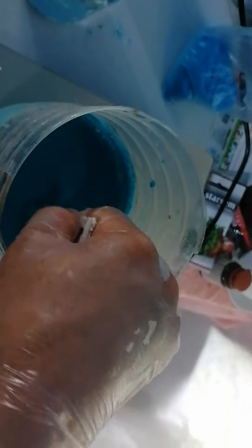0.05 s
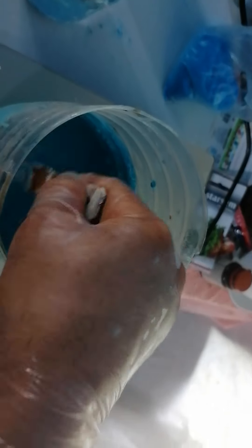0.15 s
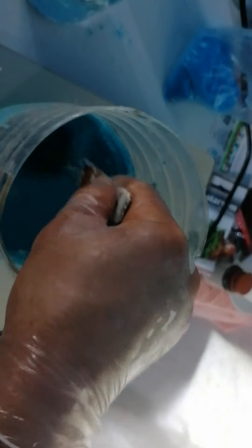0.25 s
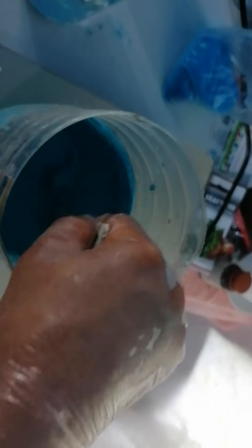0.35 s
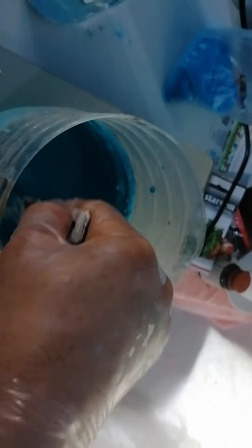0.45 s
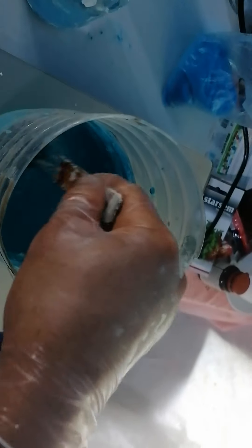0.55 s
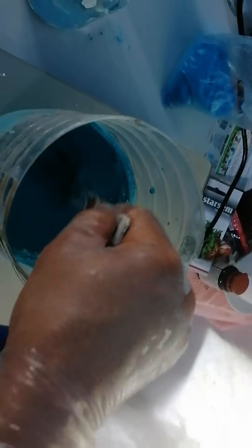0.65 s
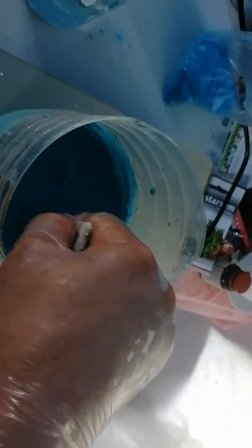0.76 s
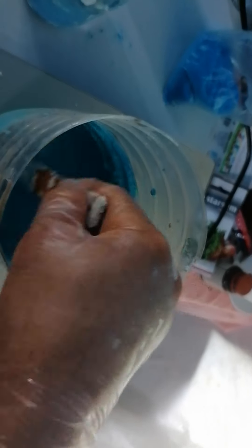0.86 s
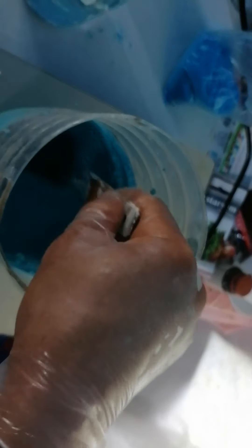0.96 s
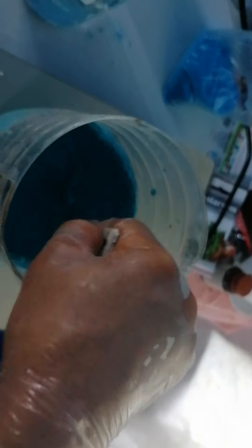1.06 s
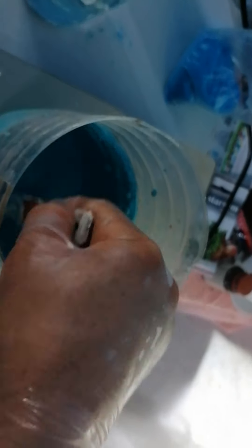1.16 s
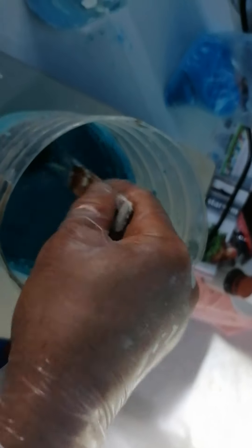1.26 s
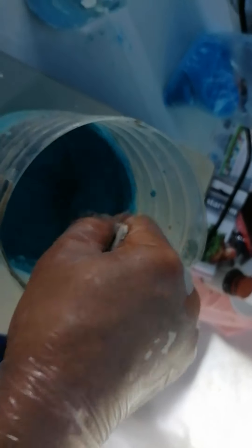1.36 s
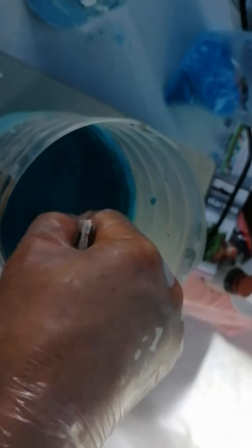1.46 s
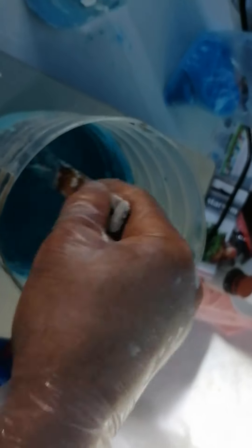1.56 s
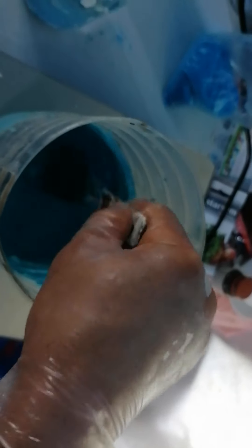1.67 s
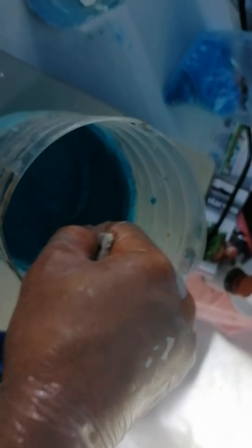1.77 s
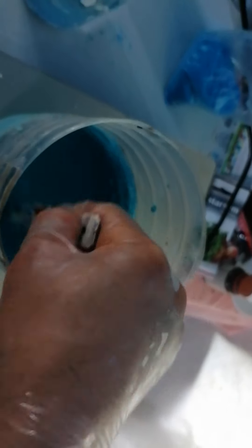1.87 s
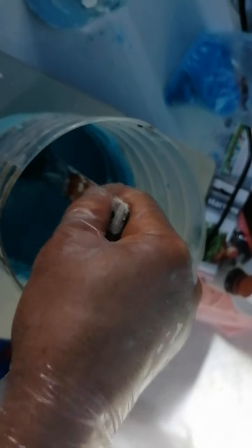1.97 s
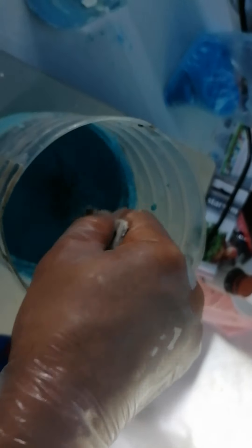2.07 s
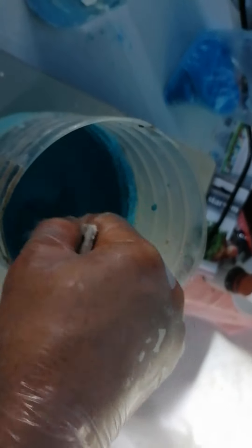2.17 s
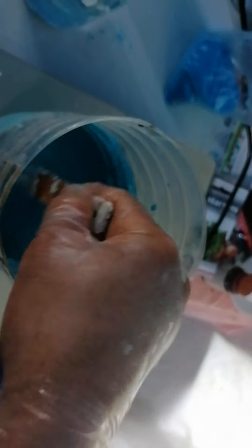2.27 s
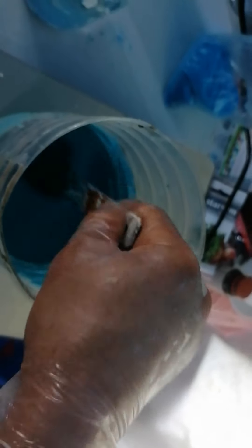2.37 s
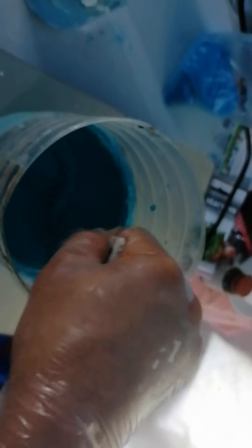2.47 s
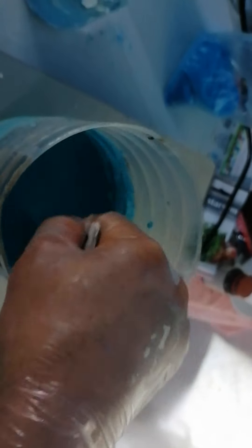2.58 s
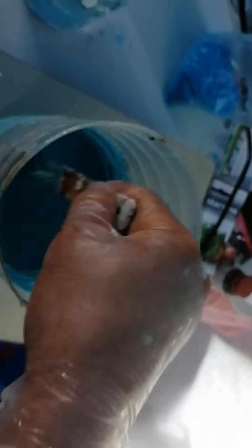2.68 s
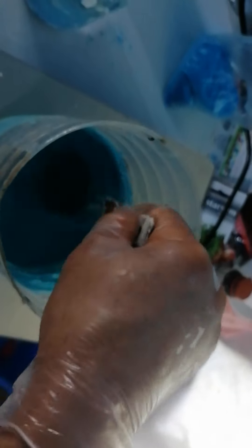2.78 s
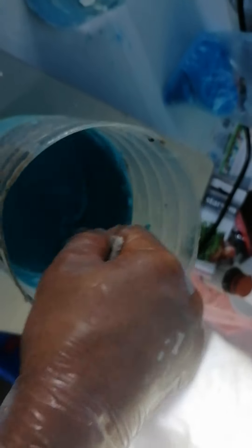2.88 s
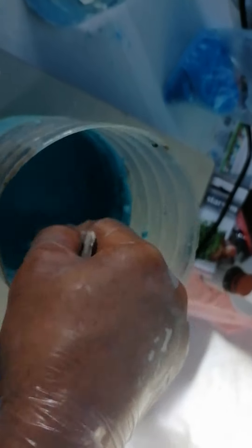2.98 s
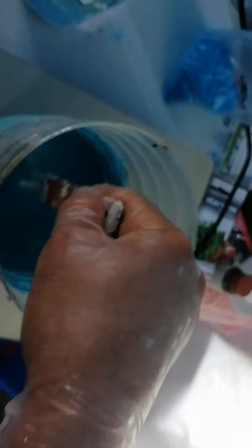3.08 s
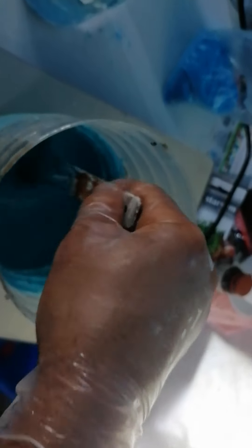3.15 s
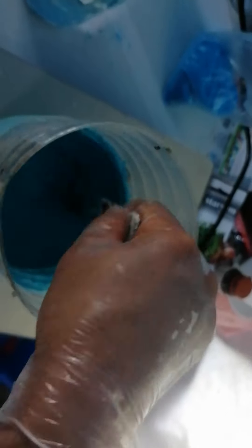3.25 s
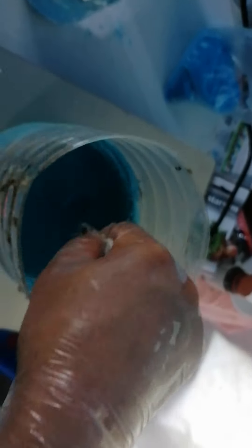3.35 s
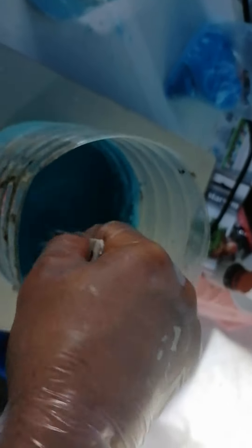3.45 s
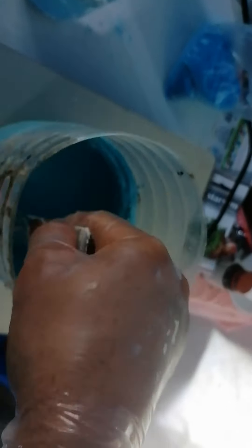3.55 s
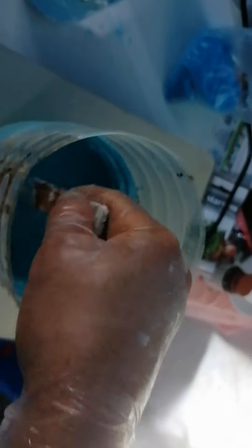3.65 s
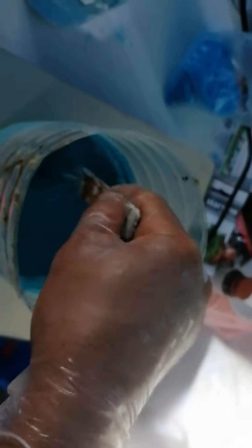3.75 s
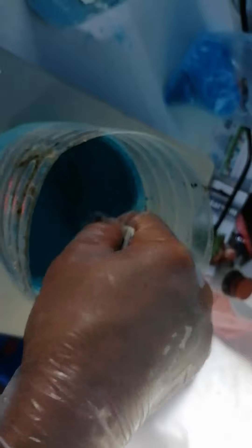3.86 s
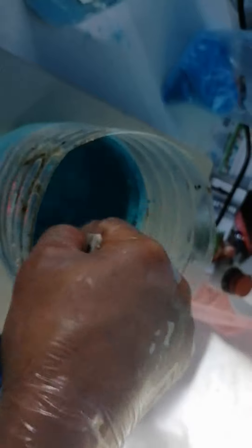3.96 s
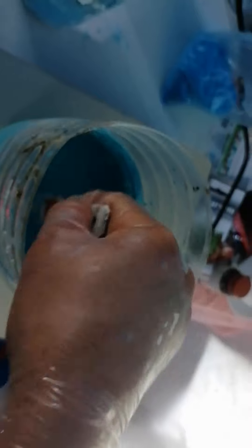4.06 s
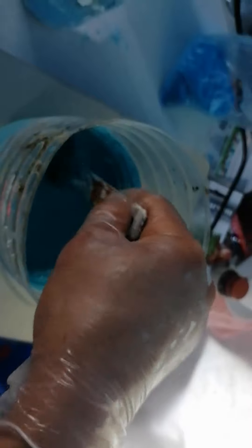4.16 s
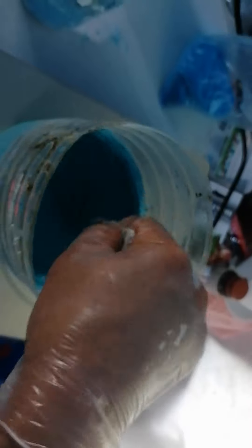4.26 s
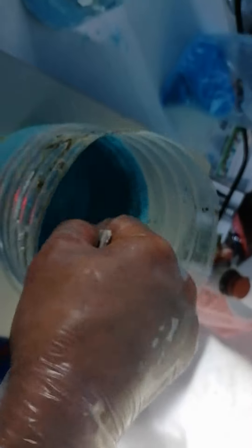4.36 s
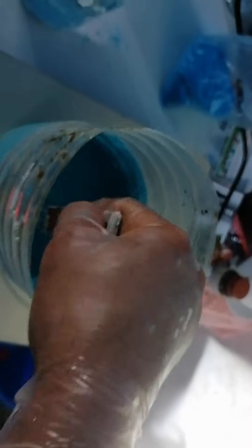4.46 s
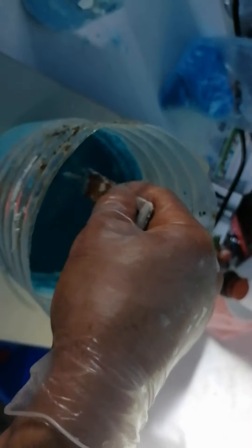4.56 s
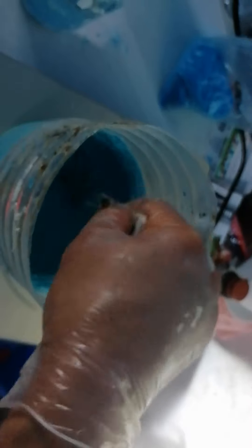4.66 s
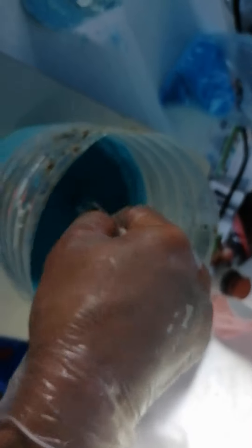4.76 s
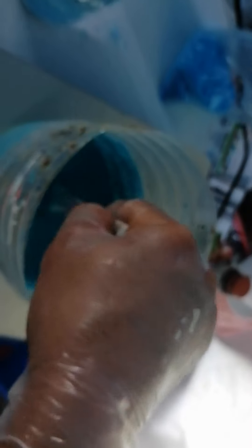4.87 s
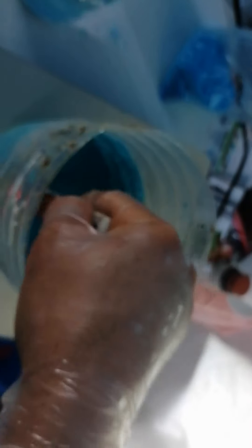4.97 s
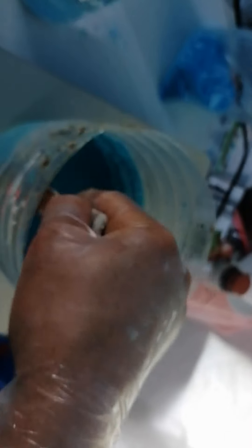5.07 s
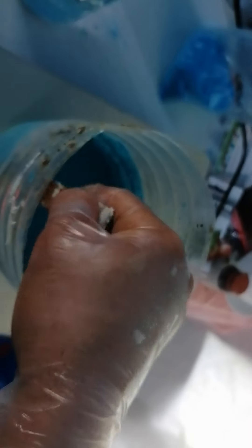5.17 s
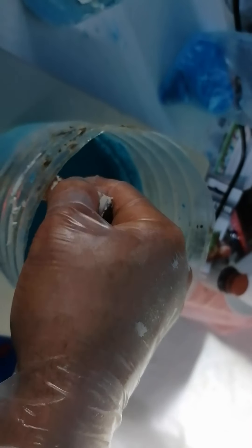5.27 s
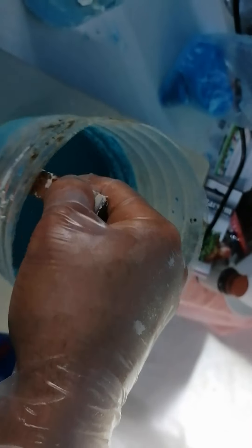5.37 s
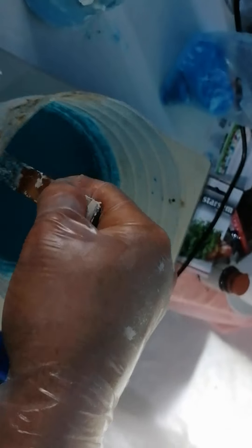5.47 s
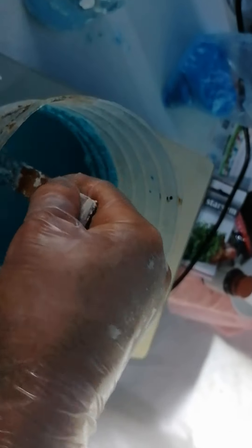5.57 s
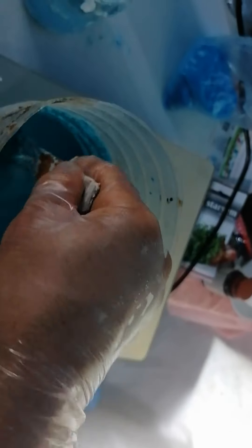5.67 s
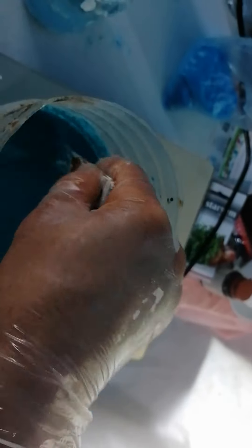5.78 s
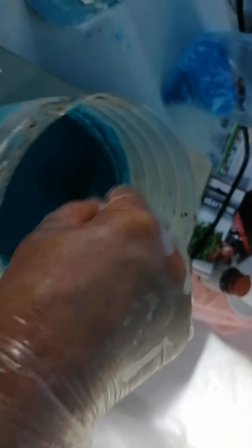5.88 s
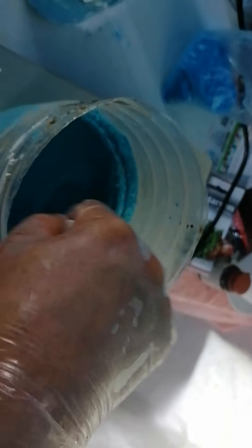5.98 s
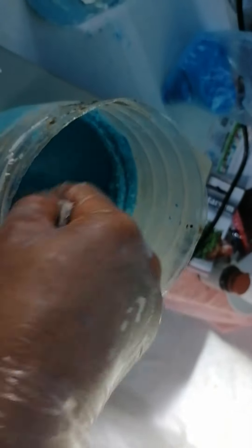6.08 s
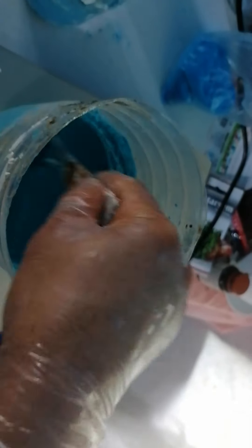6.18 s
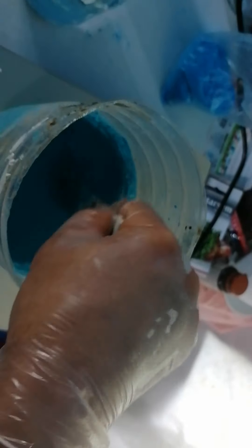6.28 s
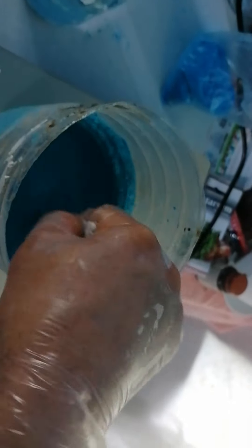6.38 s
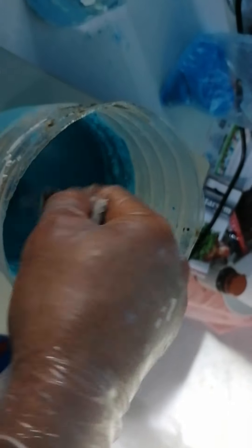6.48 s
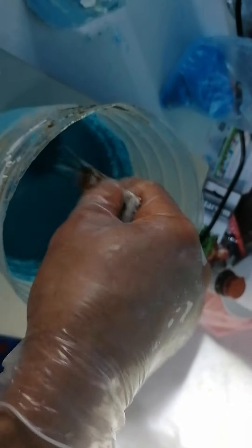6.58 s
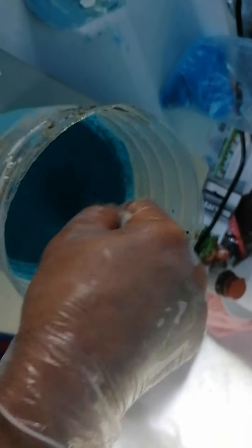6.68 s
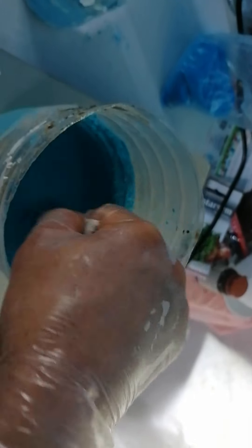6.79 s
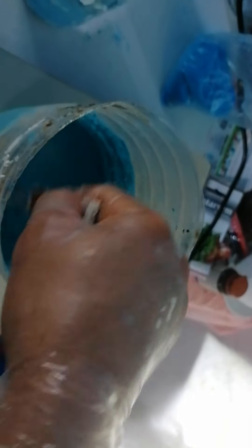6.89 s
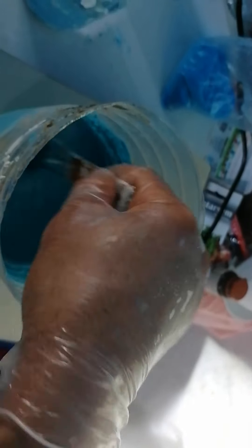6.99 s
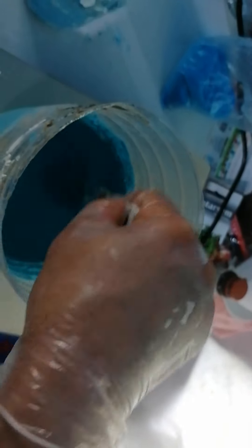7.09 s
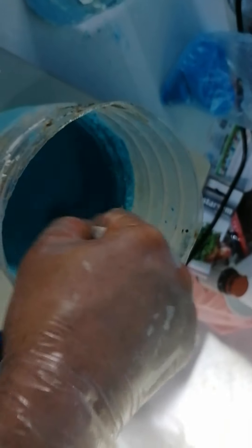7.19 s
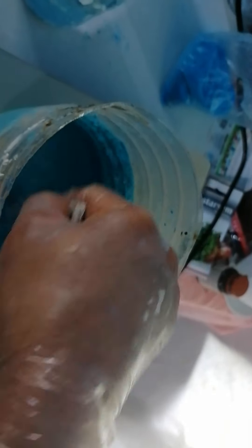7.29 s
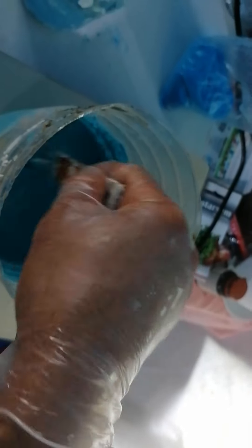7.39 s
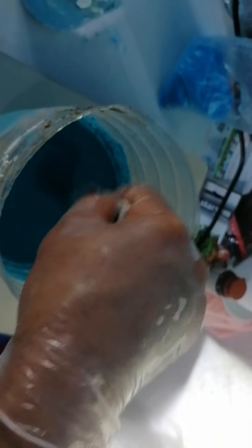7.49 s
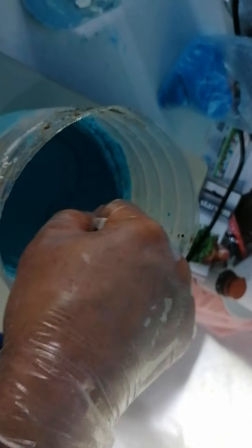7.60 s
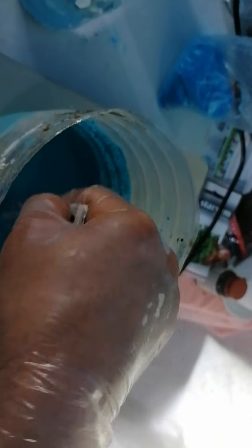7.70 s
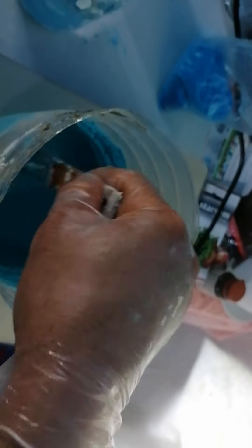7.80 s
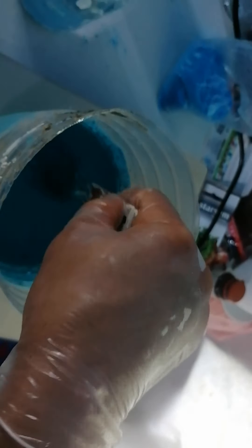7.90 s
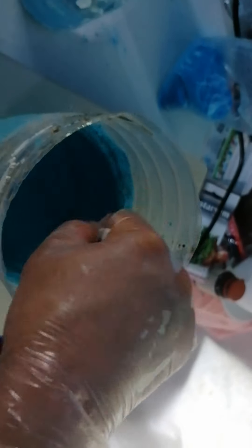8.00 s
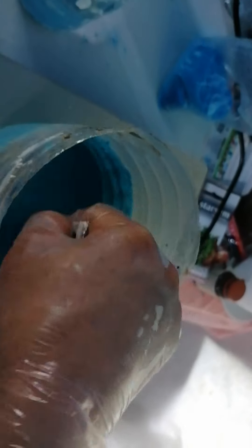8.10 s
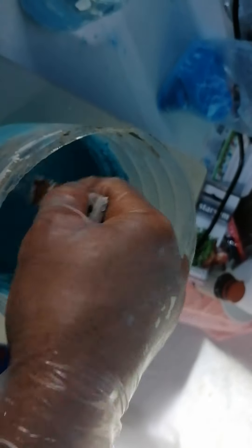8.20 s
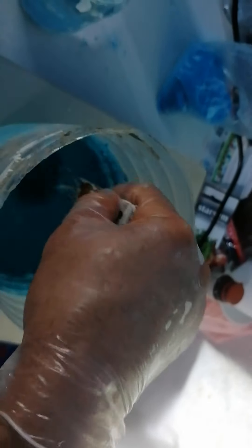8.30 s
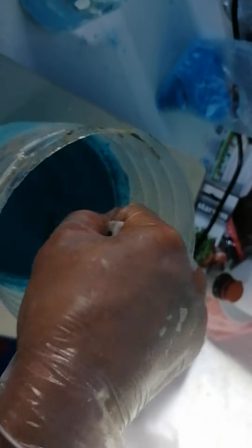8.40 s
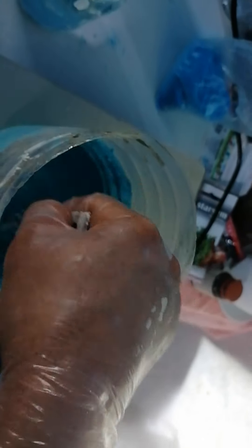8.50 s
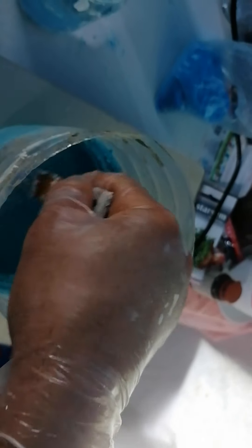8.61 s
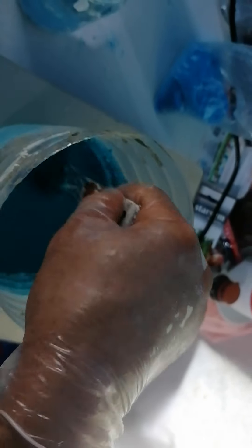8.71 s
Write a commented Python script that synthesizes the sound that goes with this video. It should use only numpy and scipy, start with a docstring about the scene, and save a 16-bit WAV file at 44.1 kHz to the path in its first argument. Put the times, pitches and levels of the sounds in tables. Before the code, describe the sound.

Close to the microphone in a small quiet room, a wooden spoon stirs thick paste in a thin plastic tub. Dry clacks with hollow, low booms come in uneven clusters, several per second. Between them are short gritty scrapes, sticky crackles, snapping air pockets and a few bubble pops. Knocking grows hardest midway, nearly stops briefly, then resumes.

```python
"""Quiet room noise, a short rasping scrape and a small wet click, then the first knock: a wooden spoon stirs
thick wet paste in a thin plastic tub, close to the microphone in a small room. Each knock is a dry clack of
damped wall resonances and noise, then a hollow boom that sags in pitch, a low base note and a thud. Between
knocks, random stick-slip grains rasp and fizz through sinking resonances, and filtered noise bursts click as
air pockets. A few bubbles pop, and once the tub booms softly, each with one short hollow note."""
import sys
import numpy as np
from scipy import signal
from scipy.fft import rfft, irfft, next_fast_len
from scipy.io import wavfile

SR = 44100
rng = np.random.default_rng(int(sys.argv[2]) if len(sys.argv) > 2 else 0)


def dump_mix(stems):
    """Bounce the given channels to the path in sys.argv[1] as a 16-bit WAV at rate SR."""
    frames = np.atleast_2d(stems).T  # one column per channel
    limited = np.clip(frames, -1, 1)  # hard clip at full scale
    pcm = np.round(limited * 32767).astype(np.int16)
    wavfile.write(sys.argv[1], SR, pcm)


N = 385434

# Event levels are source levels, ahead of the shared resonances and the balance in scene().
# Spoon sliding through the paste on the wall:
# start_s, length_s, rise_s, rasp_db, rasp_hz, fizz_db, fizz_hz (centres of the sinking resonances)
SCRAPE_STROKES = [(0.035, 0.046, 0.0098, -46, 1470, -61, 7300),
                  (0.586, 0.042, 0.008, -46.5, 1610, -62, 6860),
                  (0.812, 0.083, 0.0089, -45.5, 1660, -51.5, 7560),
                  (1.474, 0.19, 0.031, -69.5, 1600, -63.5, 7060),
                  (2.211, 0.11, 0.009, -47.5, 1520, -54.5, 6900),
                  (2.638, 0.072, 0.017, -51.5, 1430, -62, 6900),
                  (2.905, 0.024, 0.0075, -54, 2310, -47, 4700),
                  (2.924, 0.032, 0.0055, -59, 1980, -53.5, 7800),
                  (3.006, 0.028, 0.005, -46, 1800, -67, 6800),
                  (3.306, 0.084, 0.0049, -47.5, 2380, -50, 3930),
                  (3.417, 0.087, .035, -52, 1900, -58.5, 7200),
                  (3.706, 0.025, .004, -73, 1700, -65.5, 7000),
                  (3.78, 0.049, 0.047, -61, 1800, -55.5, 7200),
                  (3.861, 0.039, 0.0053, -46, 1550, -52.5, 6850),
                  (3.913, 0.035, 0.013, -42, 1540, -57.5, 3730),
                  (4.308, 0.038, .004, -51.5, 2260, -53, 7120), (4.338, 0.14, 0.023, -50, 1500, -58, 3970),
                  (4.692, 0.057, 0.0069, -45, 1930, -47, 3510), (5.806, 0.1, 0.013, -59, 1770, -60.5, 7440),
                  (6.163, 0.049, 0.029, -41, 1900, -44.5, 7000), (6.225, 0.026, .006, -48, 1150, -62, 6900),
                  (6.48, 0.072, .035, -44, 1700, -50.5, 3950), (6.715, 0.027, 0.0031, -48, 2000, -51, 7050),
                  (6.891, 0.1, .025, -57.5, 1610, -67.5, 7030)]
# Larger air pockets snapping in the paste: start_s, level_db, pocket_hz
POCKET_SNAPS = [(0.052, -50, 8700), (0.731, -49.5, 3430), (0.761, -61, 4000), (0.775, -51, 3330),
                (0.808, -53.5, 7200), (0.859, -39.5, 6300), (0.956, -53, 3720), (1.305, -58, 6930),
                (1.475, -49.5, 8640), (1.612, -56, 7500), (1.746, -46, 11660), (1.816, -37, 6960),
                (1.922, -56, 6100), (2.167, -50.5, 4600), (2.206, -59, 9210), (2.296, -52.5, 6900),
                (2.378, -49.5, 3250), (2.472, -49, 4300), (2.78, -44, 7200), (2.826, -43, 7600),
                (2.889, -52, 2970), (2.927, -46.5, 5100), (3.071, -41.5, 5660), (3.252, -73, 7000),
                (3.503, -54, 7440), (3.866, -48, 1580), (4.103, -59, 4000), (4.56, -52.5, 3000),
                (4.981, -43.5, 6250), (5.049, -38.5, 3820), (5.464, -50.5, 9800), (6.167, -47.5, 6950),
                (6.357, -57.5, 5100), (6.675, -77, 11500), (6.716, -50, 7060), (6.882, -64, 5960),
                (7.968, -44, 5100), (8.399, -49.5, 2030), (8.416, -48, 1930), (8.463, -46.5, 8500)]
# Spoon against the wall; the faint row at 2.027 s is no knock but a bubble bursting, played # through the same
# parts: start_s, panel_hz, base_db, wall_db, wall_hz, rim_db, rim_hz, panel_db, # snap_db (before SNAP_DB),
# boom_db, boom_hz, boom_swell_s, boom_fade_s (2 ms at least), thud_db
SPOON_KNOCKS = [(0.109,720,-43, -38.5, 1480, -51, 2520, -41, -61.0, -22.5, 423, 0.0065, 0.018, -42.5),
                (0.141,720,-44, -39, 1440, -43.5, 2460, -37, -55.5, -23, 384, 0.0046, 0.014, -44),
                (0.157,730,-51, -47.5, 1360, -67, 2750.0, -62, -62, -19, 419, 0.0069, 0.0082, -40.5),
                (0.295,790,-54, -41, 1905, -52, 2580, -45, -73, -28, 408, 0.012, 0.0028, -44.5),
                (0.467,820,-52, -35, 1514, -52, 2420, -38.5, -68.5, -17.5, 414, 0.0082, 0.011, -42),
                (0.506,695,-41.5, -35.5, 1390, -44, 2630, -37, -70, -37, 455, 0.0046, 0.0063, -43),
                (0.532,824,-54, -58, 1300.0, -64, 2740, -61, -75, -28.5, 419.5, 0.0082, 0.019, -45),
                (0.633,1080,-39, -38, 1790, -52, 2770, -47, -64, -27, 393, 0.024, 0.0057, -45),
                (0.729,1180,-38, -39.5, 1180.0, -55, 3400, -40, -81, -26, 422, 0.0083, 0.0018, -44.5),
                (0.756,604,-58, -54.5, 1420, -72, 2900.0, -42, -76, -28.5, 395, 0.0064, 0.02, -53.5),
                (0.859,600,-53.5, -48.5, 1900, -46, 2700, -39.5, -41, -30, 410.5, 0.021, 0.0066, -47),
                (0.91,600,-60, -43, 1380, -58, 2650, -54, -61, -23, 410, 0.011, 0.01, -45),
                (0.99,755,-43, -36.5, 1970, -58, 2680, -45.5, -69, -20.5, 393.4, 0.016, 0.015, -48),
                (1.023,590,-49.5, -50, 1770, -66, 2600, -54, -85, -31.5, 404, 0.0082, 0.0088, -56),
                (1.184,735,-44.5, -36, 1460, -56, 2940, -39, -61, -28, 425, 0.0069, 0.014, -42.5),
                (1.213,600,-43.5, -43.5, 1420, -74, 2640, -46, -73, -23.5, 415.5, 0.012, 0.021, -41.5),
                (1.233,600,-57, -47, 1540, -64, 2900, -55.5, -62.5, -42, 400, 0.0061, 0.006, -58),
                (1.252,830,-61, -53.5, 1450, -73, 2490.0, -48.5, -67, -24.5, 400, 0.012, 0.0088, -60),
                (1.329,730,-43, -36, 1470, -49, 2700, -44.5, -75, -25, 392, 0.016, 0.0079, -44),
                (1.373,600,-47.5, -34, 1910, -53, 2700, -35.5, -72, -28.5, 402, 0.015, 0.011, -48),
                (1.512,625,-50, -42, 1580, -53, 3430, -41, -72, -29, 391, 0.027, 0.0028, -44.5),
                (1.679,685,-45, -29, 1770, -44, 2650, -28.5, -47, -18, 379.7, 0.0096, 0.0097, -39.5),
                (1.718,587,-55, -54.5, 1560, -54, 2550.0, -43, -69.0, -32, 417, 0.0072, 0.011, -43),
                (1.816,800,-51, -29, 1540, -35, 2290, -43, -50, -31, 428, 0.006, 0.0057, -56),
                (1.879,670,-39, -37, 1450, -50, 2260, -42, -60, -19, 413, 0.013, 0.012, -42),
                (2.027,940,-68, -54, 1310, -55, 2860, -46, -51, -56, 410, 0.004, 0.0055, -64),
                (2.115,850,-45.5, -32.5, 1190, -36, 2420, -32, -48.5, -21.5, 422, 0.0031, 0.0076, -74),
                (2.139,614,-64, -51, 1170, -63, 2440, -43, -71, -27, 410, 0.0054, 0.011, -62),
                (2.251,690,-49, -42.5, 1550, -75, 2880.0, -39, -63, -22, 413, 0.021, 0.0079, -41.5),
                (2.4,696,-50.5, -48, 1700, -57, 2700, -46, -66, -27, 392, 0.0071, 0.016, -46),
                (2.483,827,-52, -47, 1180.0, -59, 2720, -42.5, -72, -29, 408, 0.0025, 0.0096, -52),
                (2.603,790,-44, -42.5, 1980, -79, 2490.0, -44.5, -68, -18.5, 398, 0.012, 0.012, -40.5),
                (2.678,740,-48, -53, 1410.0, -81, 3550.0, -52, -70, -40.5, 424, 0.03, 0.028, -49),
                (2.955,714,-41, -41.5, 1620, -46.5, 2400, -44, -74, -25.5, 406, 0.01, 0.041, -41.5),
                (3.026,733,-35, -34, 1430, -42, 2400, -38.5, -57, -21, 423, 0.0061, 0.0068, -33.5),
                (3.058,610,-41, -50, 1780, -67.5, 3550.0, -48, -59, -28, 412.5, 0.018, 0.0181, -43.5),
                (3.381,590,-41.5, -27, 1530, -38.5, 2450.0, -34, -57, -22, 397, 0.004, 0.013, -47),
                (3.404,583,-51, -48.5, 1510, -63.5, 2500.0, -36, -74, -22, 410, 0.0048, 0.0094, -46),
                (3.438,620,-57, -44, 1500.0, -49, 2430, -39, -61, -26.5, 376, 0.012, 0.0062, -45),
                (3.468,657,-49, -43.5, 1460, -55.5, 2510.0, -44, -62, -22, 404, 0.011, 0.0076, -37),
                (3.502,780,-36.5, -46.5, 1740, -61.0, 2930.0, -44, -64, -24.5, 413, 0.008, 0.0034, -43),
                (3.603,700,-39, -42.5, 1670, -61, 2640, -44, -66, -23, 387, 0.0044, 0.0089, -38),
                (3.632,640,-46, -50.5, 1470, -52, 2590, -48, -72.5, -34.5, 460, 0.0093, 0.0068, -43),
                (3.748,820,-38.5, -45.5, 1960, -71, 2940, -44.5, -67, -26, 319, 0.0064, 0.011, -49),
                (3.804,604,-58, -53, 1870, -66, 2780.0, -61, -68, -31.5, 400, 0.0098, 0.006, -49),
                (4.032,613,-52, -34.5, 1450, -40, 2720, -30.5, -55.5, -15.5, 411, 0.006, 0.014, -45),
                (4.056,610,-50, -36.5, 1890, -57, 2700, -42, -72.5, -36, 410, 0.0032, 0.0054, -55),
                (4.069,696,-47, -36, 1870, -59, 2740.0, -43, -71, -34, 407.0, 0.012, 0.0055, -42),
                (4.108,596,-35, -41, 1600, -53, 3120.0, -40.5, -55.5, -20, 405, 0.016, 0.0027, -41),
                (4.131,650,-50, -58, 1636, -67, 2850, -67, -78, -34, 460, 0.0068, 0.0089, -47),
                (4.232,800,-32.5, -29.5, 1690, -44, 2580, -35.5, -68, -15.5, 430, 0.0082, 0.0021, -40),
                (4.252,644,-52, -49, 1420, -67, 2420, -44, -52, -29.5, 378, 0.0057, 0.004, -56),
                (4.395,590,-35.5, -25.5, 1510, -35, 2370, -28, -49, -18.5, 403.5, 0.0051, 0.035, -36.5),
                (4.445,690,-36, -37, 1990.0, -56, 2620, -41, -54.5, -21.5, 424, 0.015, 0.013, -36),
                (4.511,610,-49, -36.5, 1890, -61, 2470, -48, -67, -34, 360, 0.0063, 0.0103, -49),
                (4.542,630,-34, -33.5, 1230, -40, 2420, -32, -57, -19.5, 389, 0.0033, 0.013, -39),
                (4.572,650,-42.5, -52.5, 1450, -61, 2900, -50, -68, -29.5, 411, 0.0058, 0.012, -47),
                (4.727,605,-37, -29.5, 1800, -59, 2710, -28.5, -60, -23.5, 420, 0.0029, 0.0036, -38),
                (4.759,820,-53, -47.5, 1390.0, -68, 2660, -49, -61, -25.5, 431, 0.011, 0.0086, -39),
                (4.783,654,-24.5, -27.5, 1460, -38, 2350, -27.5, -47.5, -21, 380, 0.008, 0.006, -38),
                (4.802,780,-38, -45, 1440, -61, 2500.0, -34, -74, -18, 410.5, 0.011, 0.016, -47),
                (4.838,780,-54, -61.5, 1340.0, -75, 2800.0, -43, -79, -29.5, 421.0, 0.015, 0.02, -61),
                (4.902,770,-52, -48.5, 1550.0, -69, 2670, -44, -66.5, -35.5, 424, 0.016, 0.026, -46),
                (4.96,724,-55, -50, 1340, -75, 2680, -39.5, -67, -31.5, 398.0, 0.0045, 0.0049, -51),
                (4.984,660,-67, -43.5, 1430, -50, 2700, -49, -64, -37.5, 435, 0.0088, 0.018, -55),
                (5.05,1200,-58, -46.5, 2170, -41, 2550, -55, -64, -37.5, 398, 0.003, 0.016, -46.5),
                (5.07,700,-45, -43.5, 1560, -54, 2500, -49.5, -65.5, -31.5, 419, 0.01, 0.009, -46),
                (5.847,746,-41.5, -46, 1700, -71, 2500, -52, -69, -31, 330, 0.0098, 0.0047, -45),
                (5.96,720,-58, -45.5, 1820, -59, 2640, -48, -73, -38, 383, 0.025, 0.0055, -55),
                (6.032,870,-38, -32, 1810, -48, 2520, -43, -59, -26, 437, 0.013, 0.0091, -48),
                (6.073,760,-33, -37, 1530, -65, 2750.0, -39.5, -72.0, -27, 398, 0.023, 0.0055, -42),
                (6.099,736,-44, -40.5, 1720, -68, 2610.0, -45, -71.0, -30, 372, 0.01, 0.0064, -45.5),
                (6.132,874,-43.5, -45.5, 1880, -58, 2580.0, -45, -60.5, -28, 386, 0.0068, 0.0098, -43),
                (6.203,1080,-56, -49, 1880, -50, 2620, -42, -52, -35, 413, 0.0083, 0.006, -62),
                (6.478,676,-42, -48, 1170, -58, 2640, -41.5, -71, -31, 400, 0.0076, 0.0046, -47.5),
                (6.514,600,-40.5, -46, 1560, -46, 2970, -46, -68, -24, 402, 0.0057, 0.013, -45.5),
                (6.535,1180,-47, -55.5, 1910, -46, 2970, -60, -59, -33, 370, 0.0073, 0.0068, -53),
                (6.608,810,-43.5, -36, 1720, -66, 2920, -27, -64, -15, 414, 0.013, 0.0074, -43),
                (6.907,786,-46, -45.5, 1560, -49.5, 2800, -45.5, -60, -34, 338, 0.017, 0.0049, -43.5),
                (6.925,604,-46, -45.5, 1490, -64, 3180.0, -52, -72, -29.5, 409, 0.0042, 0.0057, -40.5),
                (6.997,756,-36.5, -49.5, 1270, -65, 2630.0, -52, -73, -27, 386, 0.0064, 0.0079, -42.5),
                (7.093,598,-46.5, -35, 1370, -45.5, 2620, -42.5, -81.5, -19, 412.6, 0.0069, 0.023, -40.5),
                (7.293,610,-41.5, -32.5, 1510, -45, 2860, -36.5, -62, -13, 413, 0.012, 0.012, -39.5),
                (7.348,600,-49, -47, 1940, -50, 2650, -67, -59.5, -28, 374, 0.019, 0.0051, -43),
                (7.366,804,-36, -36.5, 1790, -50, 2670, -39, -57, -16.5, 411, 0.012, 0.0091, -42.5),
                (7.404,870,-51, -68, 1670, -75, 2850, -52, -70, -31, 391, 0.0097, 0.015, -45),
                (7.517,890,-46.5, -53.5, 1700, -59, 2710, -51, -78.5, -25.5, 375, 0.0084, 0.011, -44.5),
                (7.738,820,-35, -32, 1580, -49, 3260, -38.5, -62.5, -18.5, 397, 0.02, 0.0026, -37.5),
                (7.806,750,-32.5, -45, 1580, -63, 2510, -51, -67, -23.5, 384, 0.007, 0.0066, -37),
                (7.831,800,-43, -65, 1500, -70, 2860.0, -62, -67, -37, 427, 0.016, 0.0063, -40.5),
                (7.902,585,-58, -61.5, 1900, -67, 2760, -58, -62.5, -32, 383, 0.01, 0.0055, -40.5),
                (8.119,665,-42.5, -41.5, 1640, -53, 2750, -48.5, -62.5, -22.5, 403, 0.0049, 0.0069, -47),
                (8.155,660,-35.5, -47, 1580, -57, 2530, -65, -65, -29, 425, 0.0063, 0.012, -43),
                (8.178,716,-33.5, -34.5, 1850, -46, 2670, -37, -51, -15, 401.3, 0.008, 0.0077, -43),
                (8.343,680,-50, -49.5, 1400, -56, 2540, -47, -73, -34, 413.0, 0.021, 0.0068, -42.5),
                (8.406,682,-47.5, -39.5, 1870, -69, 2720, -31, -51, -18.5, 416, 0.012, 0.0092, -49),
                (8.593,690,-51.5, -42.5, 1550, -61, 2780.0, -44, -80, -37, 440, 0.0045, 0.0095, -55.5),
                (8.633,720,-49, -51, 1540, -70, 2900, -47, -77.0, -34.5, 385, 0.012, 0.013, -51),
                (8.673,820,-48, -45, 1486, -57, 2430, -41, -76, -21, 388, 0.0062, 0.01, -41.5)]
# Short hollow notes: big bubbles bursting, and at 2.825 s a brief boom of the tub at its air note: start_s,
# level_db, pitch_hz
HOLLOW_NOTES = [(0.84, -46, 1530), (2.025, -42.5, 960), (2.781, -45, 2080), (2.825, -45, 410),
                (3.5, -53, 2000), (3.6, -45, 476)]
# Ringing modes of the tub, scattered a little at each knock: mode_hz, relative_level_db, t60_s
TUB_MODES = [(207.7, -23, 0.22), (302.8, -18.5, 0.19), (361.6, -5.5, 0.13), (401.7, -6, 0.19),
             (424.34, -3, 0.18), (475.7, -9.5, 0.14), (536, -10, 0.12), (573, -19, 0.14), (652, -27, 0.14),
             (780, -23, 0.13), (953, -22, 0.1), (1134.5, -19.5, 0.083), (1487, -24.5, 0.1),
             (1940, -19, 0.094)]
# Bending modes of the thin wall: mode_hz, width_hz, peak_db
WALL_MODES = [(1130, 61, 3), (1365, 90, 1.5), (1480, 70, 1), (2079, 140, 2.5)]
# Treble resonances of the microphone ports: peak_hz, width_hz, peak_db
PORT_PEAKS = [(6850, 150, -1), (7700, 190, 2), (10150, 260, 4), (13350, 400, 2)]
# Tone curves, each: freq_hz, relative_gain_db
AIR_TONE = [(20, -31.5), (70, -21.5), (150, -19), (280, -20.5), (410, -16.5), (600, -16), (1100, -19.5),
            (1900, -15.5), (4500, -28), (7000, -26), (9000, -32.5), (15000, -53)]  # room hiss
RUMBLE_TONE = [(25, -11), (36, -6), (43, 0), (53, -6), (80, -6), (130, -13), (440, -50)]  # table under the tub
RASP_TONE = [(100, -18), (280, -3), (410, 5), (600, -3), (1000, -7), (1500, 0), (2100, -1), (2600, -7),
             (3200, -8), (4000, -13), (5500, -21), (10000, -42)]  # spoon rubbing the wall
FIZZ_TONE = [(1000, -20), (3000, 0), (4800, -3), (5800, -2), (7000, 4), (8400, -4), (10000, -3),
             (12000, -11), (14000, -12), (15500, -19)]  # wet film under a scrape
TICK_TONE = [(300, -20), (1000, -6), (2000, 2), (3200, -2), (4800, -4), (7000, 3), (8400, -2), (10000, -3),
             (13000, -8), (15500, -14)]  # snapping air pocket
SNAP_TONE = [(1500, -27.5), (3500, -5), (4800, -4), (7000, 5), (8400, -11), (11000, -9), (15000, -31.5)]  # wet film snapping at a knock
THUD_TONE = [(25, -12), (70, -17.5), (140, -10.5), (200, -1.5), (280, -1.5), (350, -2), (600, -10.5),
             (1500, -55)]  # base against the table
SMEAR_TONE = [(1000, -15), (3000, 1), (4800, -2), (5800, -1), (7000, 4), (8400, -7), (10000, -11),
              (12000, -20), (15500, -30)]  # crackle of the disturbed paste
# Relative level of the wet crackle over time: time_s, relative_level_db
WETNESS_CURVE = [(0, -6.5), (0.899, -1.5), (3.398, -7.5), (6.2, -12.5), (7.101, -17.5), (8.7, -1.5)]
# Decay of the small room by band: freq_hz, t60_s
ROOM_DECAY = [(150, 0.85), (400, 0.33), (1000, 0.2), (2700, 0.091), (7000, 0.13), (15000, 0.14)]
# How alike the two ports hear a sound: freq_hz, correlation (0 to 1)
PORT_LIKENESS = [(60, 0.46), (130, 0.75), (400, 1), (700, 0.36), (1400, 0.62), (3000, 1), (7000, 0.04),
                 (15000, 0.02)]

# "Follow" settings are dB gained per dB of the event that drives them
AIR_DB = -69
RUMBLE_DB, RUMBLE_FOLLOW, RUMBLE_SETTLE_S = -63.5, 1, 0.4
SQUELCH_GLIDE = .12  # share by which a scrape's resonances sink as the gap behind the spoon widens
TICK_TILT_DB = -2.5  # per octave
# Small pockets burst at random in the wake of knocks: count, level, pitch range, longest wait
SMALL_TICKS, SMALL_TICK_DB, SMALL_TICK_HZ, SMALL_TICK_AFTER_S = 14, -67, (2450, 8800), 0.058
# Wet film at a knock: extra level, range of its random pitch, spread of its random tilt (dB per octave)
SNAP_DB, SNAP_HZ, SNAP_TILT_DB = 1, (3350, 10400), 4
# After-ring of the tub: its level for a boom of USUAL_DB
USUAL_DB, RING_DB, RING_FOLLOW = -22, -30, 0.77
# Loaded base of the tub: note, its scatter from blow to blow (share), swell, fade
BASE_HZ, BASE_SPREAD, BASE_RISE_S, BASE_FADE_S = 299.8, 0.05, .006, .019
# The spoon slides on after each knock, with an uneven grip: depth of the variation and time per step
SLIDE_DB, SLIDE_S, SLIDE_FOLLOW = -60.5, .08, .3
GRIP_DB, GRIP_S = 3, .011
HOLLOW_HZ, HOLLOW_WIDTH_HZ, HOLLOW_DB = 414, 50, 6  # note of the air inside the tub
EDGE_HZ = 15500  # upper band limit


def amp(db):
    """Decibels to gain."""
    return 10 ** (np.asarray(db) / 20)


def evened(x):
    """Scales to an rms of 1."""
    return x / np.sqrt(np.mean(x ** 2) + 1e-20)


def read(points, hz):
    """Reads a table on a log-frequency axis."""
    f, value = np.transpose(points)
    return np.interp(np.log(hz + 1), np.log(f), value)


def add(mix, s, sound):
    """Mixes a sound in at time s."""
    part = mix[:, max(round(s * SR), 0):][:, :sound.shape[-1]]
    part += sound[..., :part.shape[1]]


def placed(x, left_db):
    """Leans a sound toward the left port by a level difference."""
    return x * amp(np.array([[left_db], [-left_db]]) / 2)


def at_level(pair, db, span):
    """Sets the rms of a sound's first span seconds, taken on the mean of its channels."""
    start = pair.mean(0)[:round(span * SR)]
    return amp(db) * pair / np.sqrt(np.mean(start ** 2) + 1e-20)


def colour(pair, spectrum, tilt_db=0):
    """Causal tone filter for two drives; the ports share sound by the likeness table, least in the treble."""
    size = next_fast_len(pair.shape[1] + 2048)
    hz = abs(np.fft.fftfreq(size, 1 / SR))
    tilt = tilt_db * np.log2(np.clip(hz, 500, 12000) / 1500)
    log_gain = np.log(amp(read(spectrum, hz) + tilt))
    response = np.exp(np.conj(signal.hilbert(log_gain)))  # minimum phase
    a, b = np.fft.fft(pair, size)
    same = np.clip(read(PORT_LIKENESS, hz), -1, 1)
    ports = np.array([a, same * a + np.sqrt(1 - same ** 2) * b])
    return np.fft.ifft(ports * response).real[:, :pair.shape[1]]


def resonant(pair, hz, width_hz, db):
    """Adds a ringing resonance that stands db above the rest."""
    band = signal.lfilter(*signal.iirpeak(min(hz, 15000), hz / width_hz, fs=SR), pair)
    return pair + (amp(db) - 1) * band


def gliding(pair, hz, quality, db):
    """Adds a resonance on the moving pitch hz: shift it down to zero, low-pass, shift it back up."""
    turn = np.exp(2j * np.pi * np.cumsum(hz) / SR)
    r = np.exp(-np.pi * hz.mean() / quality / SR)
    band = 2 * (turn * signal.lfilter([1 - r], [1, -r], pair / turn)).real
    return pair + (amp(db) - 1) * band


def through_wall(x):
    """Whatever touches the wall rings its bending modes."""
    for hz, width_hz, db in WALL_MODES:
        x = resonant(x, hz, width_hz, db)
    return x


def through_hollow(x):
    """The air in the tub sings at one note under every rub and click."""
    return resonant(x, HOLLOW_HZ, HOLLOW_WIDTH_HZ, HOLLOW_DB)


def grains(size, per_s, spread_db):
    """Two trains of tiny slips, mostly small and now and then large."""
    strength = amp(spread_db * np.minimum(rng.exponential(1, (2, size)), 4))
    return rng.standard_normal((2, size)) * strength * (rng.random((2, size)) < per_s / SR)


def wake(settle, follow):
    """How stirred up things are: every knock gives a swell that settles, louder clacks a larger one."""
    t, shoves = np.arange(2 * SR) / SR, np.zeros((1, N))
    for s, _, _, clack_db, *_ in SPOON_KNOCKS:
        add(shoves, s, amp(follow * clack_db) * t / settle * np.exp(-2 * t / settle))
    return evened(shoves)


def air():
    """Quiet room noise, and a low table rumble that swells after each knock."""
    hiss, low = rng.standard_normal((2, 2, N))
    swell = amp(RUMBLE_DB) * evened(.5 + wake(RUMBLE_SETTLE_S, RUMBLE_FOLLOW))
    return amp(AIR_DB) * evened(colour(hiss, AIR_TONE)) + swell * evened(colour(low, RUMBLE_TONE))


def scrapes(release=.012, judder_db=2.2, rasp_quality=7, rasp_peak_db=10, fizz_quality=9, fizz_peak_db=7):
    """Stick-slip under uneven pressure: the wall rasps and the film fizzes, each in a sinking resonance."""
    out = np.zeros((2, N))
    for start, length, rise, rasp_db, rasp_hz, fizz_db, fizz_hz in SCRAPE_STROKES:
        size = max(round(length * SR), 512)
        t = np.arange(size) / SR
        # a new random pressure every 260 samples, joined by straight lines
        pressure = np.interp(np.arange(size) / 260, np.arange(64), rng.standard_normal(64))
        slips = grains(size, per_s=14000, spread_db=2.2) * amp(judder_db * pressure)
        sink = 1 + SQUELCH_GLIDE * (.5 - t / t[-1])
        rasp = gliding(colour(slips, RASP_TONE, tilt_db=-0.5), rasp_hz * sink, rasp_quality, rasp_peak_db)
        fizz = gliding(colour(slips, FIZZ_TONE, tilt_db=-6.0), fizz_hz * sink, fizz_quality, fizz_peak_db)
        stroke = np.minimum(t / rise, 1) * np.minimum((t[-1] - t) / release, 1)
        add(out, start, stroke * (amp(rasp_db) * evened(rasp) + amp(fizz_db) * evened(fizz)))
    return out


def ticks(rise=.0006, decay=.004, crumble_db=-20, crumble=.024, quality=10, pocket_db=10):
    """An air pocket snaps and rings as a filtered noise burst, with finer grains crumbling after it."""
    t, out = np.arange(4096) / SR, np.zeros((2, N))
    small = []
    for which, wait, pitch in rng.random((SMALL_TICKS, 3)):
        knock_s = SPOON_KNOCKS[int(which * len(SPOON_KNOCKS))][0]
        hz = np.interp(pitch, [0, 1], SMALL_TICK_HZ)
        small.append((knock_s + wait * SMALL_TICK_AFTER_S, SMALL_TICK_DB, hz))
    for s, db, hz in POCKET_SNAPS + small:
        snap = rng.standard_normal((2, len(t))) * np.exp(-t / decay) * (1 - np.exp(-t / rise))
        after = evened(grains(len(t), per_s=1100, spread_db=5)) * amp(crumble_db) * np.exp(-t / crumble)
        tick = resonant(colour(snap + after, TICK_TONE, TICK_TILT_DB), hz, hz / quality, pocket_db)
        add(out, s, at_level(tick, db, .008))
    return out


def flutter(hz, db, decay, rough, linger=0.042, linger_db=-20, slope_db=-18):
    """One damped resonance: a short note amid the scatter of neighbouring modes (noise around its pitch)."""
    t = np.arange(4096) / SR
    fade = np.exp(-t / decay)
    scatter = rng.standard_normal((2, len(t))) * (fade + amp(linger_db) * np.exp(-t / linger))
    skirt = [(hz * 2 ** octave, slope_db * max(abs(octave) - .15, 0) * (1 + abs(octave)))
             for octave in (-1.5, -.6, -.15, .15, .6, 1.5)]
    port_turns = np.array([[0], [.15]])  # phase offset between the ports
    note = np.sin(2 * np.pi * (hz * t + rng.random() + port_turns)) * fade * (1 - np.exp(-hz * t))
    return at_level(note / np.std(note) + rough * evened(colour(scatter, skirt)), db, .011)


def bend(pair, lag):
    """Bending waves run faster at high pitch: a falling chirp, lag / 2 late at 1 kHz, on time above 4 kHz."""
    hz = np.fft.rfftfreq(pair.shape[1], 1 / SR)
    delay = lag * np.maximum(np.sqrt(1000 / np.maximum(hz, 400)) - .5, 0)
    return irfft(rfft(pair) * np.exp(-2j * np.pi * np.cumsum(delay) * hz[1]), pair.shape[1])


def clacks(decay=0.0057, rim_decay=0.0058, rough=2.1, panel_rough=2.6,
           snap_decay=0.0055, snap_rise=0.00062, pocket_db=7, lag=0.00221):
    """Wood hits the wall: contact spot, stiff rim and broad panel ring briefly, and the wet film snaps."""
    t, out = np.arange(4096) / SR, np.zeros((2, N))
    for s, panel_hz, _, wall_db, wall_hz, rim_db, rim_hz, panel_db, snap_db, *_ in SPOON_KNOCKS:
        film = rng.standard_normal((2, len(t))) * np.exp(-t / snap_decay) * (1 - np.exp(-t / snap_rise))
        pocket_hz = np.interp(rng.random(), [0, 1], SNAP_HZ)
        film = colour(film, SNAP_TONE, SNAP_TILT_DB * rng.standard_normal())
        snap = resonant(film, pocket_hz, pocket_hz / 10, pocket_db)
        wall = flutter(wall_hz, wall_db, decay, rough)
        rim = flutter(rim_hz, rim_db, rim_decay, rough)
        panel = flutter(panel_hz, panel_db, decay, panel_rough)
        clack = wall + rim + panel + at_level(snap, snap_db + SNAP_DB, .011)
        add(out, s - .001, bend(clack, lag))
    return out


def booms(detune=0.015, sag=0.034, shape=1.42):
    """The wall flexes and pumps the air in the tub for a few cycles, sagging in pitch; the modes ring on."""
    t, out = np.arange(SR // 3) / SR, np.zeros((2, N))
    mode_hz, mode_db, t60 = np.transpose(TUB_MODES)[:, :, None]
    for s, *_, db, hz, swell, fade, thud_db in SPOON_KNOCKS:
        swell, fade = max(swell, .002), max(fade, .002)
        rise = np.sin(np.pi / 2 * np.minimum(t / swell, 1)) ** 2
        flex = rise * np.exp(-(np.maximum(t - swell, 0) / fade) ** shape)
        turns = np.cumsum(hz * (1 - sag * np.tanh((t - swell) / (swell + fade)))) / SR
        push = flex * np.sin(2 * np.pi * (turns + rng.random()))
        # the load of the paste shifts the modes from blow to blow
        shift = 1 + detune * rng.standard_normal((len(TUB_MODES), 1))
        phase = rng.random((len(TUB_MODES), 1))
        tones = np.sin(2 * np.pi * (mode_hz * shift * t + phase))
        modes = (amp(mode_db - 60 * t / t60) * tones).sum(0)
        ring = modes / np.std(modes[:SR // 20]) * (1 - np.exp(-(t / (swell + fade)) ** 2))
        ring_db = RING_DB + RING_FOLLOW * (db - USUAL_DB)
        add(out, s, amp(db) * push + amp(ring_db) * ring)
    return out


def thuds(decay=0.033, rise=0.0022):
    """Each knock also pushes the tub's base against the table: a short burst of low noise."""
    t, out = np.arange(SR // 3) / SR, np.zeros((2, N))
    for s, *_, db in SPOON_KNOCKS:
        shake = colour(rng.standard_normal((2, len(t))), THUD_TONE)
        shake = shake * np.exp(-t / decay) * (1 - np.exp(-t / rise))
        add(out, s, at_level(shake, db, .03))
    return out


def bases():
    """The base of the tub, weighed down by the paste, answers with a lower and duller note."""
    t, out = np.arange(SR // 4) / SR, np.zeros((2, N))
    swell = (1 - np.exp(-(t / BASE_RISE_S) ** 2)) * np.exp(-t / BASE_FADE_S)
    for s, _, db, *_ in SPOON_KNOCKS:
        hz = BASE_HZ * (1 + BASE_SPREAD * rng.standard_normal())
        note = np.sin(2 * np.pi * (hz * t + rng.random()))
        add(out, s, at_level((note * swell)[None], db, .04))
    return out


def crackle(size, per_s, spread_db, cycles=4, count=14):
    """Tiny wet slips of many pitches, each ringing a few cycles, mostly small and now and then large."""
    t, out = np.arange(512) / SR, np.zeros((2, size))
    for hz in np.geomspace(1100, 14000, count) * rng.uniform(.92, 1.08, count):
        grain = np.sin(2 * np.pi * hz * t) * np.exp(-hz * t / cycles) * hz / SR
        slips = grains(size, per_s / count, spread_db)
        out += signal.oaconvolve(slips, grain[None], axes=1)[:, :size]
    return evened(out) + .5 * evened(grains(size, per_s, spread_db))


def paste(settle=0.012, follow=0.84, rasp_db=-58, smear_db=-78.5):
    """After every knock the spoon drags on, and the disturbed paste crackles until it settles."""
    t = np.arange(N) / SR
    slips = crackle(N, per_s=6800, spread_db=5) * wake(settle, follow)
    wetness = amp(np.interp(t, *np.transpose(WETNESS_CURVE)))
    smear = evened(colour(slips, SMEAR_TONE) * wetness)
    steps = N // 256
    grip = amp(GRIP_DB * np.interp(t / GRIP_S, np.arange(steps), rng.standard_normal(steps)))
    drag = grains(N, per_s=6600, spread_db=3.0) * grip * wake(SLIDE_S, SLIDE_FOLLOW)
    slide = evened(colour(drag, RASP_TONE))
    rasp = evened(colour(slips, RASP_TONE))
    return amp(rasp_db) * rasp + amp(smear_db) * smear + amp(SLIDE_DB) * slide


def plops(decay=0.0053, rough=0.25):
    """A big bubble bursts, or the tub gives a brief boom: one short hollow note."""
    out = np.zeros((2, N))
    for s, db, hz in HOLLOW_NOTES:
        add(out, s, flutter(hz, db, decay, rough))
    return out


def room(x, first=0.0063):
    """Small room: a dense noise tail for each port, each band dying at its own speed."""
    noise = colour(rng.standard_normal((2, SR // 2)), [(20, 0), (20000, 0)])
    hz, t, z = signal.stft(noise, SR, nperseg=256)
    decay = amp(-60 * t / read(ROOM_DECAY, hz)[:, None])
    tail = signal.istft(z * decay, SR, nperseg=256)[1]
    tail *= 1 - np.exp(-(np.arange(tail.shape[1]) / SR / first) ** 2)  # soft onset
    return signal.fftconvolve(x, tail / np.linalg.norm(tail[0]), axes=1)[:, :N]


def scene():
    """All parts of the stirring, with the room round them."""
    wet = placed(through_hollow(through_wall(ticks() + scrapes() + paste())), left_db=4)
    wall = placed(amp(-1.5) * through_wall(clacks()) + plops(), left_db=3.5)
    body = placed(amp(2.0) * booms() + amp(1.0) * thuds() + bases(), left_db=1.65)
    echo = room(amp(-11.0) * wall + amp(-19.5) * body + amp(-11.0) * wet)
    return wall + body + wet + echo + placed(air(), left_db=4.0)


def record(dry):
    """The right port hears all four samples late, both ports ring in the treble; then the band limit."""
    ports = np.array([dry[0], np.pad(dry[1], (4, 0))[:N]])
    for hz, width_hz, db in PORT_PEAKS:
        ports = resonant(ports, hz, width_hz, db)
    low_pass = signal.firwin(255, EDGE_HZ, window=("kaiser", 9), fs=SR)
    return signal.oaconvolve(ports, low_pass[None], "same")


dry = scene()
out = record(dry)
dump_mix(out)
```